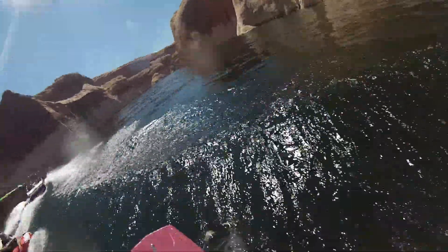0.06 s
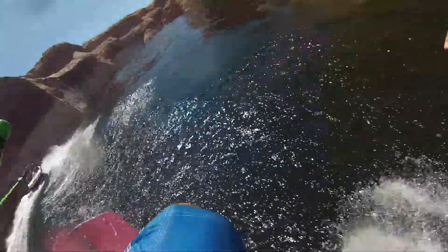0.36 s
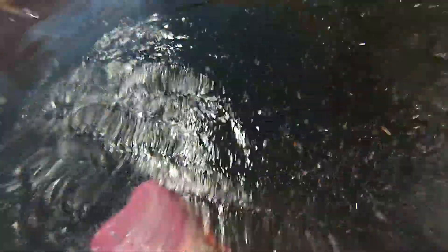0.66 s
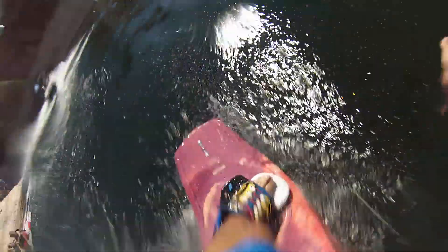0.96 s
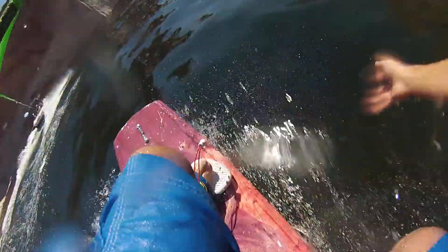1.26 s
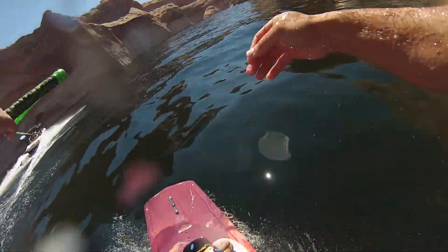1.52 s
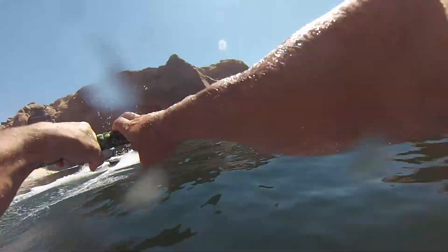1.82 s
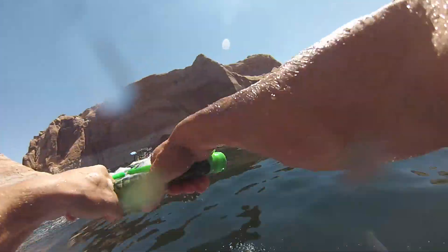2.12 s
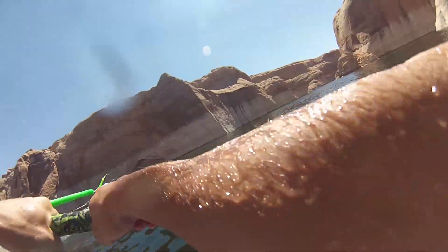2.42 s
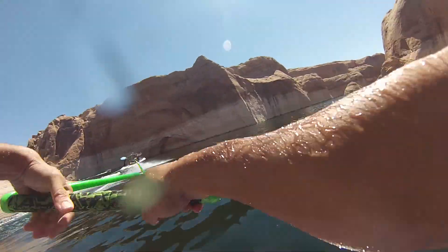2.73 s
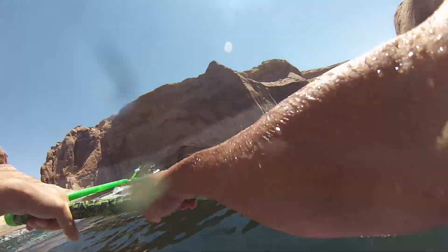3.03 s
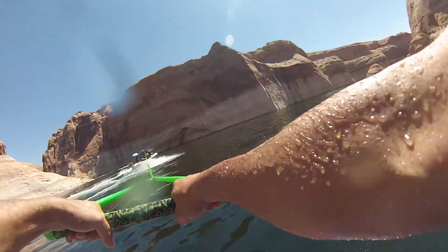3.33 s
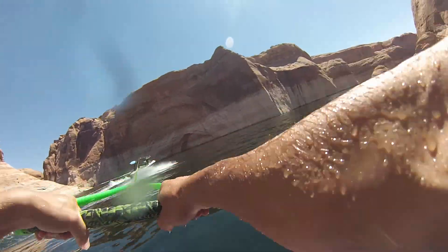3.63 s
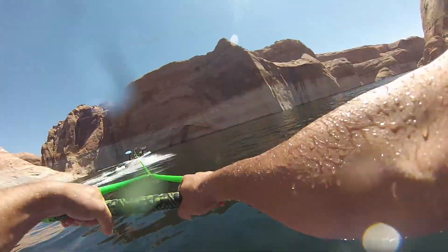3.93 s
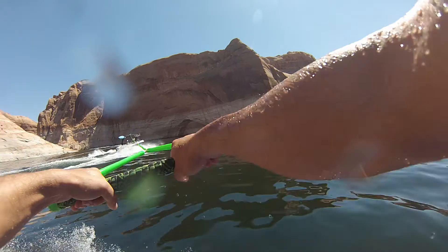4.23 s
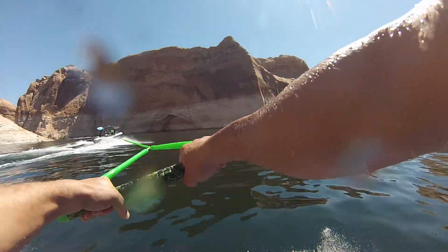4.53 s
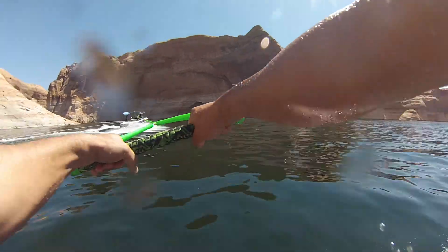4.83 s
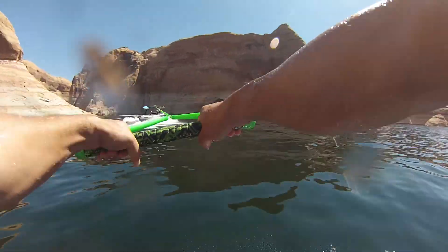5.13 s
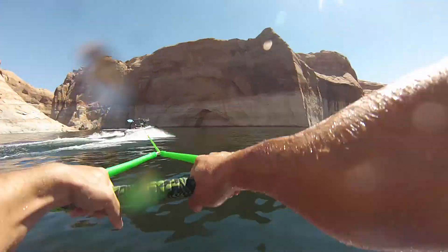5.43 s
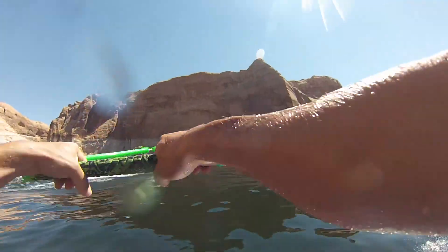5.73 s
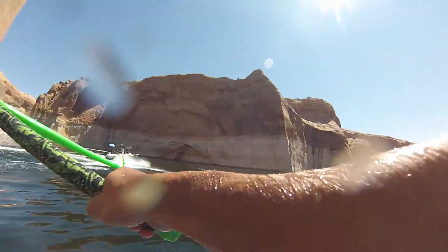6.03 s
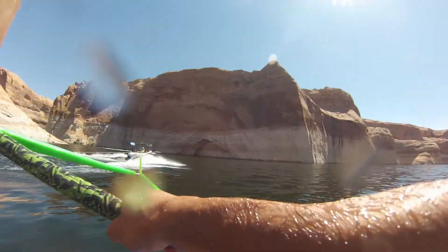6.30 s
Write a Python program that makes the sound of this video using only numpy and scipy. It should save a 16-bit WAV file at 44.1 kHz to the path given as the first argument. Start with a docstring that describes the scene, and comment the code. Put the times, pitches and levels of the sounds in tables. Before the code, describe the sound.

A wakeboard rushes over calm water, heard from a body-worn microphone in a waterproof case. Almost at once, sheets of spray and heavy drops hit the case with loud splashes, hollow knocks and gusts of wind. After about a second and a half it settles into a quieter wash, with small sloshes and low thumps at each ripple. The tow boat drones faintly ahead throughout.

```python
"""On calm water behind a tow boat: a wakeboard ride, heard from a body-worn camera in a waterproof case.
The rider spins through his own spray: sheets and drops hit the case, which rings briefly and muffles
the rest. Then the board hisses on. Each ripple sloshes, throws spray and, a moment later, jolts the
camera. Wind rumbles on the case, the boat drones ahead, a faint whistle rises and falls once."""
import sys
import numpy as np
from scipy import signal
from scipy.fft import rfft, irfft, next_fast_len
from scipy.io import wavfile
from scipy.ndimage import uniform_filter1d, map_coordinates

SR = 44100
rng = np.random.default_rng(int(sys.argv[2]) if len(sys.argv) > 2 else 0)


def unload_audio(sound):
    """Save the sound as a 16-bit wav file, at the path given as the first command line argument."""
    columns = np.transpose(np.atleast_2d(sound))
    # keep every value between -1 and 1, then stretch to whole-number steps
    steps = np.round(np.clip(columns, -1, 1) * 32767)
    wavfile.write(sys.argv[1], SR, steps.astype(np.int16))


N = 284886

# steady planing, base levels: t/s, wash/dB, spray/dB, wind/dB
PLANING = [(0, -64, -78, -47.5), (.27, -62.5, -76.5, -48), (.63, -56.5, -68, -37), (1.05, -58, -68, -41),
           (1.48, -61, -72.5, -47.5), (1.91, -62, -78, -43.5), (2.43, -65.5, -73.5, -46),
           (2.93, -63.5, -79, -47.5), (3.35, -66, -73.5, -48), (4.25, -61, -75, -50.5),
           (4.64, -67, -73, -54), (5.24, -67.5, -78, -49), (5.87, -65.5, -72.5, -47),
           (6.46, -70.5, -75.5, -48.5)]
# ripples under the board: t/s, 20 dB fall/s, slosh/dB, spray/dB, base jolt/dB
RIPPLES = [(.005, 0.2567, -57, -66.5, -47), (.272, .02, -51, -68, -43.5), (.331, 0.0762, -50, -65, -23),
           (.695, 0.1359, -50, -66, -27), (1.075, 0.07, -53, -69, -31), (1.32, 0.3534, -63, -70, -54.5),
           (1.858, 0.0557, -43, -63, -36), (1.916, 0.0776, -53, -67, -46), (2.185, 0.1153, -57, -65, -38),
           (2.494, 0.0633, -50.5, -66, -36), (2.795, .18, -50.5, -64, -23.5), (3.1, 0.24, -62, -72, -43),
           (3.62, 0.275, -60, -70.5, -31.5), (3.866, 0.0463, -56, -71, -50.5), (4.34, .05, -56, -72, -54),
           (4.41, .1, -56, -71, -55), (4.68, 0.3266, -60, -67, -53), (5.078, .1, -51.5, -66, -29),
           (5.40, .1, -51.5, -66, -22), (5.495, .07, -54, -73, -50), (5.78, 0.1281, -55, -68, -28),
           (5.92, .12, -62, -68, -47), (6.14, 0.22, -60.5, -66, -35)]
# churned foam: f/Hz, relative density/dB
WASH_SPECTRUM = [(100, -17.5), (350, -5), (560, -6), (720, -4.5), (950, -8), (1350, 2), (1600, -3),
                 (1900, -12), (2250, -1.5), (3000, -14.5), (3450, -11.5), (3800, -18), (4200, -14),
                 (9000, -37)]
# slosh, rounder than the wash: f/Hz, gain/dB
SLOSH_EQ = [(300, 0), (700, 1), (1100, 1.5), (1600, -1), (2300, 0), (4000, -1)]
# fine spray: f/Hz, relative density/dB
SPRAY_SPECTRUM = [(1000, -21), (2400, -5.5), (4500, 0), (6000, 0), (8000, 0), (9200, -7), (11500, -4.5),
                  (13000, -8.5), (14500, -8), (16000, -25)]
# spray sheets on the case: t/s, rise/s, 20 dB fall/s, body/dB, hiss/dB
SPRAY_SHEETS = [(.408, 0.0154, .14, -51.5, -54.5), (.455, 0.0353, .1, -47.5, -58.5),
                (.541, 0.0073, 0.0229, -20.5, -30), (.555, .005, .026, -28.5, -29),
                (.577, 0.0083, 0.0126, -36, -39.5), (.781, 0.017, .06, -36.5, -45),
                (.799, 0.0069, 0.0276, -31, -55), (0.861, .015, .1, -49, -60),
                (1.188, .034, .035, -50, -48), (1.206, 0.0051, 0.0171, -37, -44)]
# sheet drumming: f/Hz, relative density/dB
DRUM_SPECTRUM = [(60, -0.5), (200, 1.5), (450, -2), (560, -6), (740, 3), (950, -8), (1400, -1.5),
                 (1700, -8), (2050, 4.5), (2900, -16), (5000, -26.5), (12000, -60)]
# sheet breaking up: f/Hz, relative density/dB
SIZZLE_SPECTRUM = [(1200, -24.5), (2600, 2), (4200, 0), (7800, -2), (9000, -8), (11300, -1.5), (13500, -10),
                   (15000, -9), (16000, -28.5)]
# heavy drops: t/s, peak before low-pass/dB, softness/(dB/octave)
HEAVY_DROPS = [(.388, -17.5, -0.5), (.472, -21.5, 5), (0.535, -13.5, -13.5), (.5395, -7.5, -8),
               (.687, -33, 0), (0.7666, -18, 7), (0.8102, -11.5, 2.5), (.887, -11.5, 2.5),
               (0.9243, -24, 0.5), (1.068, -36, -10.5), (1.198, -27.5, 4.5), (1.204, -18, -4),
               (1.2062, -8.5, -1), (1.2133, -29, -2), (1.300, -38.5, -2.5), (1.533, -38.5, 5),
               (1.624, -39.5, 4), (1.880, -34, 0.5), (3.115, -41, -4), (3.572, -45, -0.5), (5.378, -43, -1),
               (5.971, -44, -2)]
# case wall modes: f/Hz, relative level/dB, T60/s
CASE_MODES = [(215, -22.5, 0.0345), (445.4, -17, 0.0234), (552, -19, 0.0323), (720, -14, .02),
              (1140, -6, 0.0091), (1460, -3, 0.01124), (2000, -4, 0.00927), (2320, -3.5, 0.00737)]
# air pockets collapsing on the case: t/s, level/dB, f/Hz
AIR_POCKETS = [(.471, -26.5, 760), (.766, -24, 452), (.77, -29, 760), (.804, -25, 720), (.889, -24.5, 690),
               (1.118, -43, 684), (3.638, -50, 740), (3.766, -47, 686)]
# fine drops: t/s, level/dB, f/Hz
FINE_DROPS = [(0.396, -43, 5600), (0.5573, -30, 6430), (0.5686, -30, 6370), (0.5755, -20, 5400),
              (0.624, -45, 6500), (.661, -35, 2600), (0.7462, -33, 4770), (0.9399, -42, 5120),
              (1.0061, -41, 8000), (1.1395, -36, 7800), (6.3813, -52, 6383)]
# gusts, mostly in the spin: t/s, 20 dB fall/s, level/dB
WIND_GUSTS = [(.47, .06, -31), (.555, 0.0617, -28), (.68, 0.02, -38), (.91, 0.0979, -29),
              (1.16, .08, -28.5), (1.21, 0.07, -23), (1.289, 0.0938, -26.5), (2.09, 0.2636, -36.5),
              (2.69, 0.12, -38)]
# single eddies: t/s, peak/dB, f/Hz
EDDIES = [(.386, -26, 60), (.40, -29, 200), (.797, -21, 129), (.819, -16.5, 70), (.85, -27, 130),
          (.897, -22.5, 86), (.928, -24, 80), (1.2027, -6.5, 68), (1.234, -21, 50), (1.535, -34.5, 159),
          (1.632, -36, 189), (1.89, -29, 90), (2.275, -26, 70), (5.885, -30, 140)]
# rumble on the case: f/Hz, relative density/dB
BUFFET_SPECTRUM = [(10, -4.5), (30, 5), (60, -7.5), (120, -14), (250, -27), (500, -41), (1200, -66.5),
                   (5000, -120)]
# air past the case: t/s, centre/Hz, level before CASE_EQ/dB
AIR_HISS = [(0, 2600, -79.5), (.6, 2600, -67.5), (1.5, 2500, -70), (2.1, 3300, -73.5), (2.8, 3700, -73),
            (3.5, 3600, -70), (4.25, 3990, -65.5), (4.6, 3500, -72.5), (5.3, 3490, -72.5),
            (6.46, 3300, -77)]
# case transmission: f/Hz, gain/dB
CASE_EQ = [(1400, 2.5), (1900, -4.5), (2350, 5.5), (3000, -2.5), (3450, 2), (3800, -4), (4200, 2),
           (5000, -1)]
# crankshaft speed: t/s, f/Hz
SHAFT_SPEED = [(0, 26.58), (2.2, 26.69), (3, 26.5), (4, 26.44), (4.6, 26.57), (5.4, 26.4), (6.46, 26.47)]
# engine tones: multiple of shaft speed, rms level/dB
ENGINE_ORDERS = [(5, -57), (6, -66.5), (7, -68.5), (8, -68.5), (9, -73), (11, -65.5), (13, -64.5),
                 (14, -73.5), (15, -76), (16, -75.5), (17, -78.5), (18, -79), (19, -77.5), (21, -78)]
# exhaust: f/Hz, relative density/dB
EXHAUST_SPECTRUM = [(20, -0.5), (90, 0.5), (140, -4), (220, -13), (330, -15.5), (600, -27), (1500, -55),
                    (5000, -120)]


def wake(rise_share=.29, spray_linger=1.137):
    """The board churns foam and throws spray, more at each ripple."""
    wash_db, spray_db, _ = curves(PLANING)
    at_s, fall_s, slosh_db, throw_db, _ = np.transpose(RIPPLES)
    slosh = swells(at_s, rise_share * fall_s, fall_s, slosh_db)
    throw = swells(at_s, rise_share * fall_s, spray_linger * fall_s, throw_db)
    foam = patchy(patter(rate_hz=1200, spread_db=4.5, mist=.975), depth_db=2.5)
    foam = coloured(foam, WASH_SPECTRUM)
    splash = patter(rate_hz=900, spread_db=4.5, mist=.8) * amp(2.2 * wobble(rate_hz=70))
    splash = coloured(shaped(splash, WASH_SPECTRUM), SLOSH_EQ)
    fizz = patchy(patter(rate_hz=3000, spread_db=4.5, mist=1.2), depth_db=1.5)
    fizz = coloured(fizz, SPRAY_SPECTRUM)
    surge = wobble(rate_hz=45)
    wash = amp(wash_db + 1.185 + 1.13 * surge)
    spray = np.hypot(amp(spray_db + 1.5), throw) * amp(.6 * surge)
    return wash * foam + slosh * splash + bubbles(slosh) + spray * fizz + droplets(spray)


def bubbles(slosh, count=110, median_hz=1250):
    """Sloshes trap small bubbles; pitch rises as they surface."""
    out, t = np.zeros(N), np.arange(SR // 30) / SR
    starts = rng.choice(N, size=count, p=slosh / slosh.sum())
    for start, (pitch, strength) in zip(starts, rng.standard_normal((count, 2))):
        cycles = median_hz * np.exp(.3 * pitch) * t * (1 + 3 * t)
        envelope = (1 - np.exp(-cycles)) * np.exp(-cycles / 5)
        gain = slosh[start] * amp(2.5 + 2.73 * strength)
        add(out, start / SR, gain * envelope * np.sin(2 * np.pi * cycles))
    return out


def droplets(spray, count=70, median_hz=6500):
    """Stray droplets tick on the case, more and harder in thick spray."""
    out = np.zeros(N)
    starts = rng.choice(N, size=count, p=spray / spray.sum())
    for start, (pitch, strength) in zip(starts, rng.standard_normal((count, 2))):
        tick = ping(db=9 + 2.5 * strength, hz=median_hz * np.exp(.3 * pitch))
        add(out, start / SR, spray[start] * tick)
    return out


def sheets():
    """Spray sheets drum on the case in clumps and sizzle as they break up."""
    at_s, rise_s, fall_s, body_db, hiss_db = np.transpose(SPRAY_SHEETS)
    clumps = wobble(rate_hz=220)
    drum = patter(rate_hz=2500, spread_db=2.5, mist=.613) * amp(2.26 * clumps)
    sizzle = patter(rate_hz=4000, spread_db=5, mist=.71) * amp(2.56 * clumps)
    body = swells(at_s, rise_s, fall_s, body_db) * coloured(drum, DRUM_SPECTRUM)
    hiss = swells(at_s, rise_s, fall_s, hiss_db) * coloured(sizzle, SIZZLE_SPECTRUM)
    return body + hiss


def knocks(splat_t60_s=.0151, cutoff_hz=2550):
    """Heavy drops ring the case wall; broad soft ones favour its low modes."""
    rings, splats, t = np.zeros(N), np.zeros(N), np.arange(SR // 16) / SR
    mode_hz, mode_db, t60_s = np.transpose(CASE_MODES)[:, :, None]
    polarity = (-1) ** np.arange(len(mode_hz))[:, None]  # adjacent modes in antiphase
    octaves = np.log2(mode_hz / mode_hz[0])
    for at_s, db, soft_db_per_oct in HEAVY_DROPS:
        struck_db = mode_db - soft_db_per_oct * octaves + 1.49 * rng.standard_normal(mode_hz.shape)
        hz = mode_hz * (1 + .0295 * rng.standard_normal(mode_hz.shape))
        modes = polarity * amp(struck_db - 60 * t / t60_s) * np.sin(2 * np.pi * hz * t)
        ring = modes.sum(axis=0)
        add(rings, at_s, amp(db) * ring / np.abs(ring).max())
        add(splats, at_s, amp(db - 43.5 - 60 * t / splat_t60_s) * rng.standard_normal(len(t)))
    wall_lowpass = signal.butter(6, cutoff_hz, fs=SR, output="sos")  # little passes above the top mode
    return signal.sosfilt(wall_lowpass, rings) + splats


def plops(attack_s=.0012, t60_s=.045):
    """Each trapped air pocket rings with one short hollow note."""
    out, t = np.zeros(N), np.arange(SR // 12) / SR
    for at_s, db, hz in AIR_POCKETS:
        envelope = amp(db - 60 * t / t60_s) * (1 - np.exp(-t / attack_s))
        add(out, at_s, envelope * np.sin(2 * np.pi * hz * t))
    return out


def ticks():
    """A few fine drops stand out as they hit the case."""
    out = np.zeros(N)
    for at_s, db, hz in FINE_DROPS:
        add(out, at_s, ping(db, hz))
    return out


def ping(db, hz, attack_s=.0006, t60_s=.011):
    """One droplet bursts: a short noisy tone."""
    t = np.arange(SR // 30) / SR
    jittered_hz = hz * (1 + .5 * rng.standard_normal(len(t)))
    return amp(db - 60 * t / t60_s) * (1 - np.exp(-t / attack_s)) * np.sin(phase_rad(jittered_hz))


def jolts(delay_s=.103):
    """The rider bounces after each ripple: one slow push in a swell of rumble."""
    ripple_s, *_, jolt_db = np.transpose(RIPPLES)
    felt_s = ripple_s + delay_s
    envelope = swells(felt_s, rise_s=.052, fall_s=.09, db=jolt_db - 4)
    pushes = sum(push(at_s, db + 1.5, hz=31) for at_s, db in zip(felt_s, jolt_db))
    return envelope * noise(BUFFET_SPECTRUM) + pushes


def wind(gust_rise_s=.0225):
    """Wind and gusts buffet the case; single eddies thump on it."""
    *_, wind_db = curves(PLANING)
    at_s, fall_s, gust_db = np.transpose(WIND_GUSTS)
    steady = amp(wind_db - 1 + 2.23 * wobble(rate_hz=14))
    gusts = swells(at_s, gust_rise_s, fall_s, gust_db)
    thumps = sum(push(*eddy) for eddy in EDDIES)
    return np.hypot(steady, gusts) * noise(BUFFET_SPECTRUM) + thumps


def push(at_s, db, hz):
    """One pressure swing on the case, centred on at_s: suction, then push."""
    out, t = np.zeros(N), np.arange(-SR // 20, SR // 20) / SR
    angle_rad = 2 * np.pi * hz * t
    add(out, at_s + t[0], amp(db) * angle_rad * np.exp((1 - angle_rad ** 2) / 2))
    return out


def boat(exhaust_db=-53.5):
    """Engine at towing speed: shaft orders over exhaust noise."""
    shaft_hz, = curves(SHAFT_SPEED)
    shaft_rad = phase_rad(shaft_hz * (1 + .004014 * wobble(rate_hz=9)))
    tones = np.zeros(N)
    for order, db in ENGINE_ORDERS:
        peak = np.sqrt(2) * amp(db + 2.1 * wobble(rate_hz=7))
        tones += peak * np.sin(order * shaft_rad + 2 * np.pi * rng.random())
    return tones + amp(exhaust_db) * noise(EXHAUST_SPECTRUM)


def air():
    """Air hisses past a case edge; the band drifts as the rider turns."""
    centre_hz, hiss_db = curves(AIR_HISS)
    baseband = noise([(250, -1), (600, -3), (1000, -13), (3000, -70.5)])
    carrier = np.sin(phase_rad(centre_hz * (1 + .05 * wobble(rate_hz=12))))
    gain = amp(hiss_db + 1.17 * wobble(rate_hz=8))
    return shaped(gain * baseband * carrier, CASE_EQ)


def whistle(top_s=2.305, top_hz=1790, top_db=-62, width_s=.095, up_oct_per_s=3.8, down_oct_per_s=5):
    """A faint whistle glides up, is loudest at the top, falls a little faster."""
    age_s = np.clip(np.arange(N) / SR - top_s, -.5, .5)
    octaves = np.minimum(up_oct_per_s * age_s, -down_oct_per_s * age_s)
    hz = top_hz * 2 ** octaves * (1 + .015 * wobble(rate_hz=300))
    return amp(top_db) * np.exp(-(age_s / width_s) ** 2) * np.sin(phase_rad(hz))


def patter(rate_hz, spread_db, mist):
    """Random drop impacts, a few large, on an even mist; rms 1."""
    lands = rng.random(N) < rate_hz / SR
    sizes = amp(spread_db * np.minimum(rng.exponential(size=N), 4))
    impacts = unit(lands * sizes * rng.choice([-1, 1], N))
    return unit(impacts + mist * rng.standard_normal(N))


def patchy(x, depth_db):
    """Foam breaks in patches: random gain over time and frequency."""
    spectra = signal.stft(x, nperseg=512)[2]
    field = uniform_filter1d(rng.standard_normal(spectra.shape), size=6, axis=0)
    field = uniform_filter1d(field, size=12, axis=1)
    return signal.istft(spectra * amp(depth_db * unit(field)), nperseg=512)[1][:N]


def swells(at_s, rise_s, fall_s, db):
    """Gain curve of bursts: peak at at_s, then down 20 dB per fall_s."""
    t = np.linspace(0, N / SR, N // 32)
    age_s = t[:, None] - at_s
    build = np.exp(-(np.minimum(age_s, 0) / rise_s) ** 2)
    drain = amp(db - 20 * np.maximum(age_s, 0) / fall_s)
    return np.interp(np.arange(N) / SR, t, np.sum(build * drain, axis=1))


def wobble(rate_hz):
    """Smooth random curve, rate_hz knots per second."""
    knots = rng.standard_normal(int(N * rate_hz / SR) + 4)
    steps = np.arange(len(knots) * 8) / 8
    return np.interp(np.arange(N) * rate_hz / SR, steps, map_coordinates(knots, [steps]))


def curves(rows):
    """Per-sample curve for each column after the time."""
    at_s, *columns = np.transpose(rows)
    return [np.interp(np.arange(N) / SR, at_s, column) for column in columns]


def noise(spectrum):
    """Coloured noise, rms 1."""
    return coloured(rng.standard_normal(N), spectrum)


def coloured(x, spectrum):
    """Shaped x, rms 1."""
    return unit(shaped(x, spectrum))


def shaped(x, spectrum):
    """x through a response of f/Hz, gain/dB points."""
    points_hz, db = np.transpose(spectrum)
    return filtered(x, lambda hz: amp(np.interp(np.log(hz + 1), np.log(points_hz), db)))


def filtered(x, gain):
    """Zero-phase filter by gain(hz)."""
    size = next_fast_len(N + 8192)
    return irfft(rfft(x, size) * gain(np.fft.rfftfreq(size, 1 / SR)), size)[:N]


def phase_rad(hz):
    """Running phase of a frequency curve."""
    return 2 * np.pi * np.cumsum(hz) / SR


def amp(db):
    """dB to gain."""
    return 10 ** (np.asarray(db) / 20)


def unit(x):
    """Scale to rms 1."""
    return x / np.sqrt(np.mean(x ** 2) + 1e-20)


def add(track, at_s, sound):
    """Mix sound into track from at_s."""
    start = max(round(at_s * SR), 0)
    track[start:start + len(sound)] += sound[:max(N - start, 0)]


def scene():
    """Sum at the one microphone in the case."""
    mix = wake() + air() + sheets() + knocks() + plops() + ticks() + wind() + jolts() + boat() + whistle()
    return mix[None]


def record(dry):
    """Camera band limit."""
    limit_hz = 15750
    return filtered(dry[0], lambda hz: hz < limit_hz)[None]


dry = scene()
out = record(dry)
unload_audio(out)
```